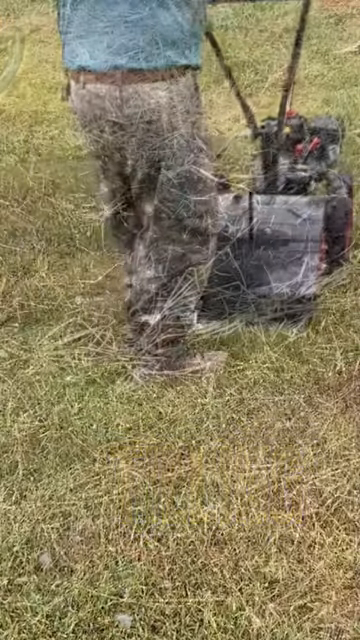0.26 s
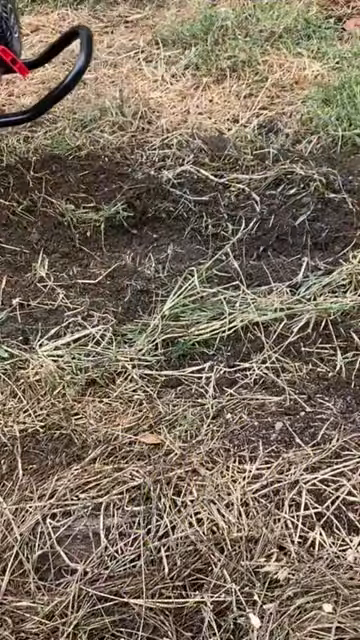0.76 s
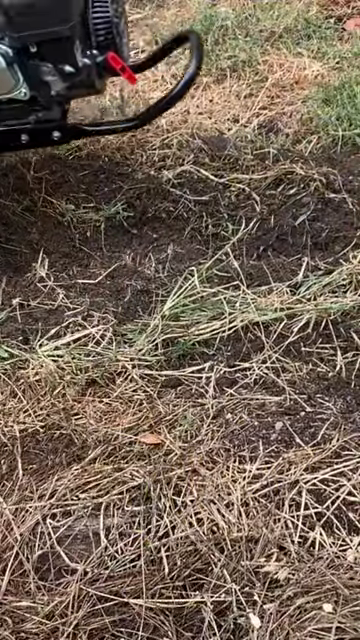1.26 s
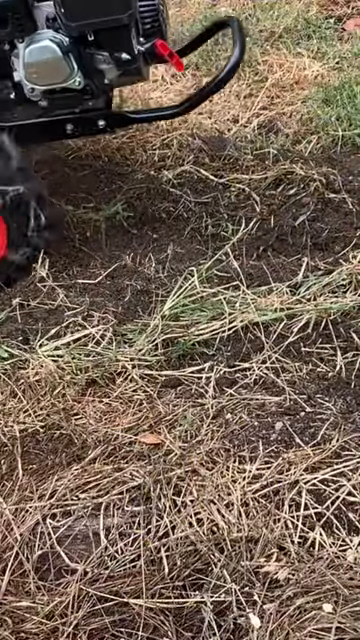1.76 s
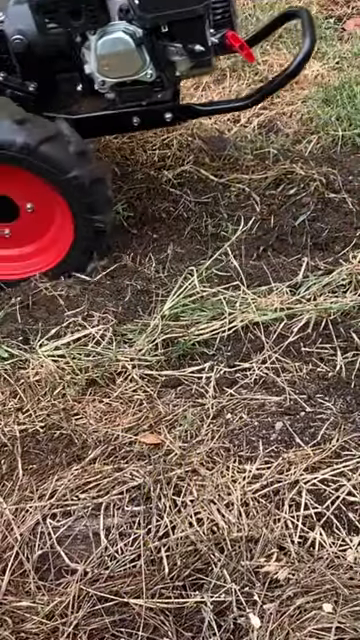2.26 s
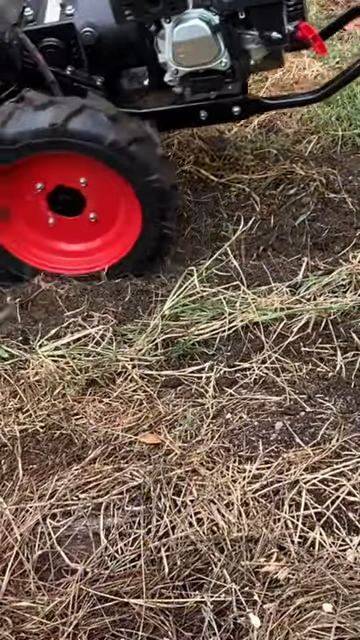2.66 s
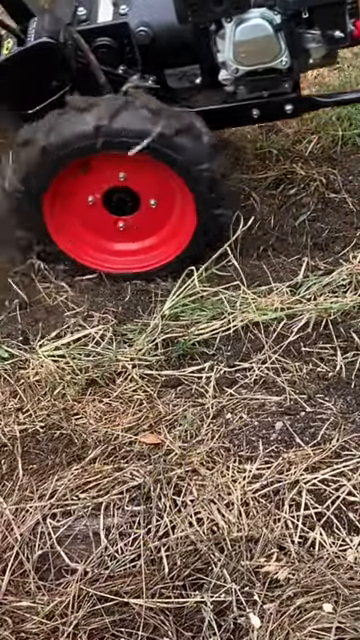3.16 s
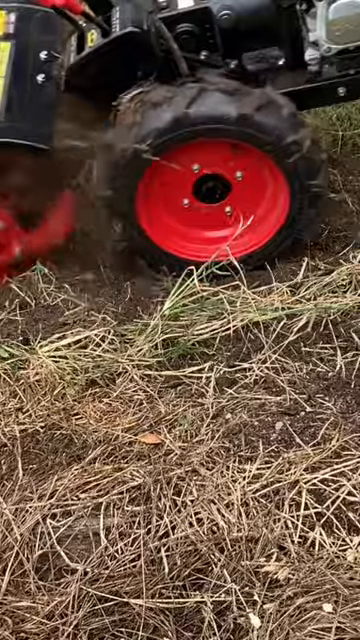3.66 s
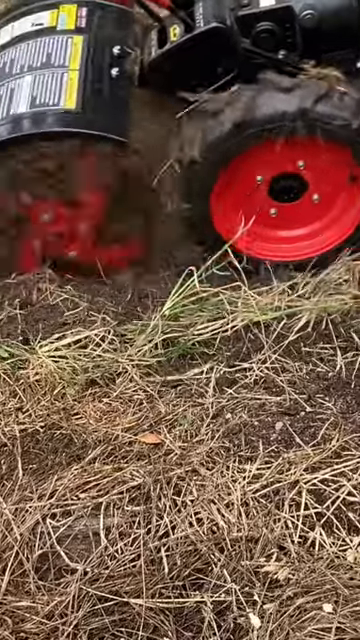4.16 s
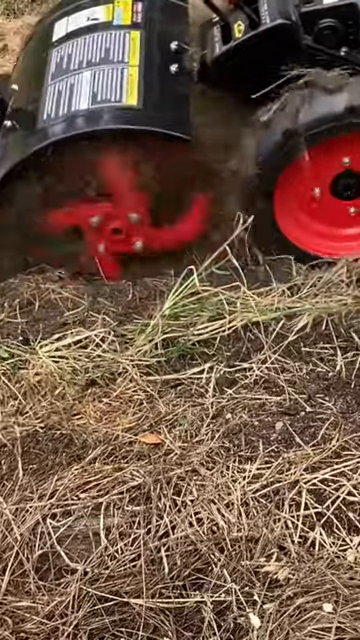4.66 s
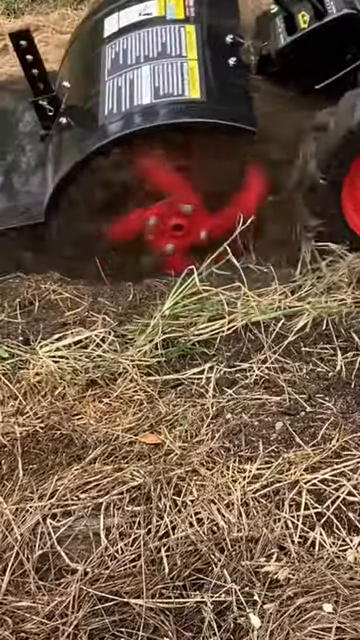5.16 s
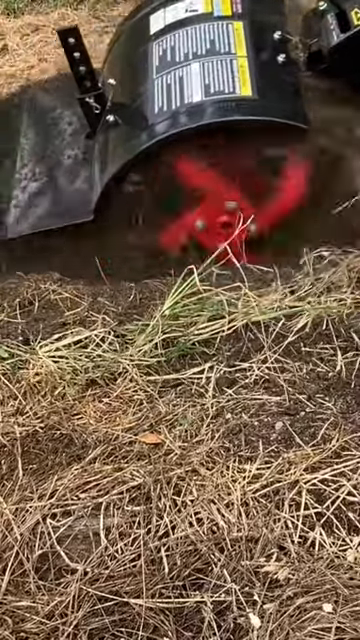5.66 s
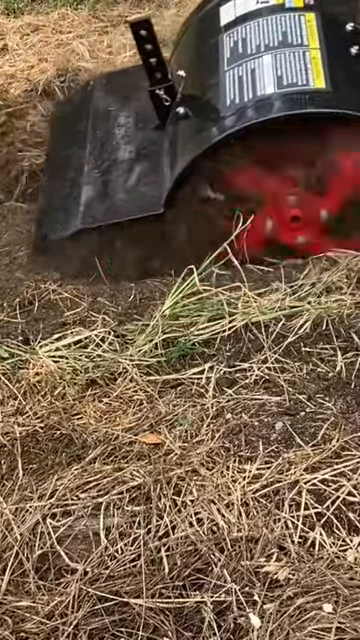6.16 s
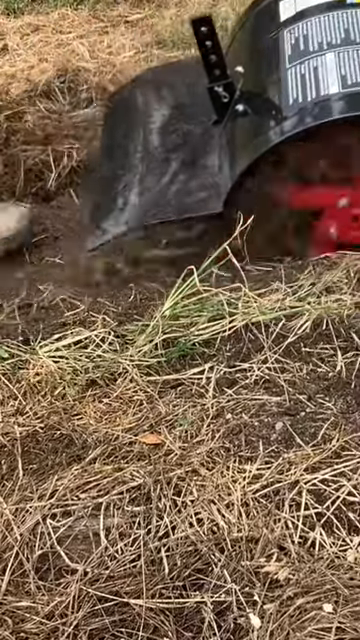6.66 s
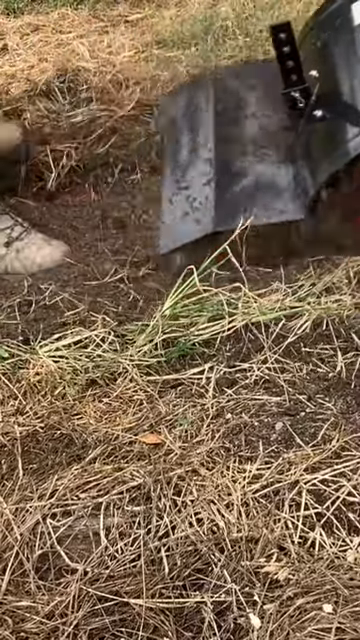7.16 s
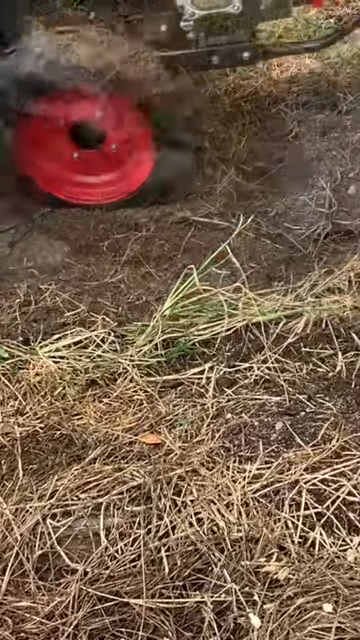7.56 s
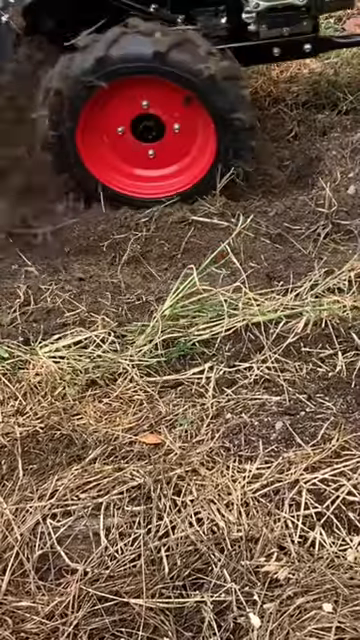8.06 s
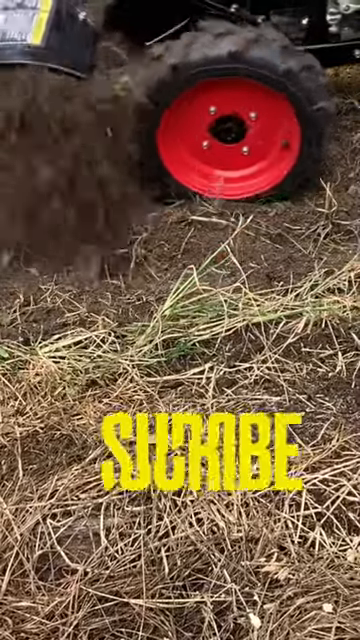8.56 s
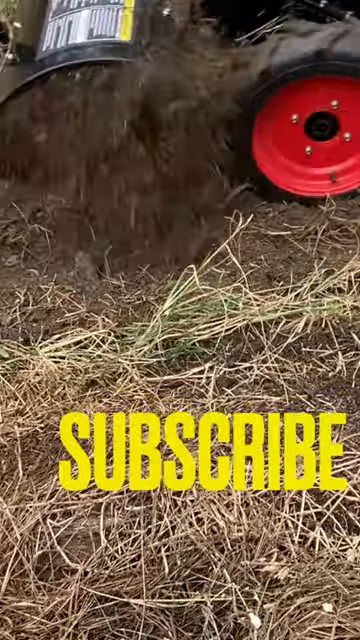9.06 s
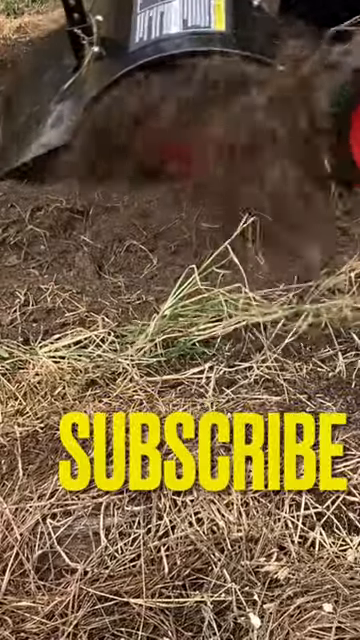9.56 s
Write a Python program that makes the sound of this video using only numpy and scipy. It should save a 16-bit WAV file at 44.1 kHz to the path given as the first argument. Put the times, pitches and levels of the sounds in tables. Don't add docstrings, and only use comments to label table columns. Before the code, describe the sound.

A small petrol tiller putters fast and rattles close by outdoors, its loose panels clacking while stones knock the metal hood and soil sprays.

```python
import sys
import numpy as np
from scipy import signal
from scipy.fft import rfft, irfft, next_fast_len
from scipy.io import wavfile
from scipy.ndimage import uniform_filter1d

SR = 44100
rng = np.random.default_rng(int(sys.argv[2]) if len(sys.argv) > 2 else 0)


def rack_gain(trim_db):
    fader = np.asarray(trim_db, float)
    return 10 ** (fader / 20)


def store_pcm(level_fs):
    pcm = np.round(np.clip(level_fs, -1, 1) * 32767).astype(np.int16)
    wavfile.write(sys.argv[1], SR, np.atleast_2d(pcm).T)


N = 432621

# from_s, to_s
DISSOLVES = [
    (.22, 0.5),
    (7.28, 7.6),
]
# start_s, peak_db, main_ring_hz, grit_peak_db (grit thrown with it)
KNOCKS = [(0.7672, -12.5, 2400, -35), (0.894, -16, 1680, -36), (1.0726, -12, 2080, -27),
          (1.246, -11, 1720, -14), (1.629, -10, 2200, -11.5), (1.691, -0.5, 1950, -6),
          (2.0836, -4.5, 2710, -1), (2.2722, -7, 2740, -6), (2.401, -15, 1860, -25),
          (2.445, -10, 1483, -16), (2.954, -10, 2570, -34), (3.3688, -17, 2560, -29),
          (3.446, -2.5, 2700, -2.5), (3.8097, -19, 2040, -26), (3.944, -19, 2560, -16),
          (4.073, -19.5, 1720, -41), (4.325, -17, 1480, -34), (4.537, -13, 2930, -6),
          (4.863, -16, 2800, -12), (6.417, -20.5, 2960, -5), (6.87, -13.5, 1926, -17),
          (6.9536, -15, 3050, -11), (7.724, -13, 1880, -23), (8.1616, -14, 2800, -29),
          (8.3128, -16, 2680, -10), (8.453, -13, 1470, -18), (8.6159, -13.5, 2730, -8),
          (8.921, -15, 2700, -8.5), (9.246, -14, 2770, -22), (9.5512, -15, 1820, -3.5)]


def in_time(rows):
    s, *columns = np.transpose(rows)
    return [np.interp(np.arange(N) / SR, s, c) for c in columns]


def rms_one(x):
    return x / np.sqrt(np.mean(x ** 2) + 1e-20)


def drift(rate):
    steps = rng.standard_normal(int(N / SR * rate) + 2)
    return np.interp(np.arange(N) / SR * rate, np.arange(len(steps)), steps)


def ring(clicks, hz, t60):
    r = rack_gain(-60 / (t60 * SR))
    w = 2 * np.pi * hz / SR
    return signal.lfilter([0, np.sin(w)], [1, -2 * r * np.cos(w), r * r], clicks + 1e-18)


def dying(clicks, t60):
    return signal.lfilter([1], [1, -rack_gain(-60 / (t60 * SR))], clicks + 1e-18)


def band(x, low_hz, high_hz):
    return signal.sosfilt(signal.butter(3, [low_hz, high_hz], "band", fs=SR, output="sos"), x)


def views():
    # time_s, cycles_per_s
    speed_behind = [(0.0, 25.48), (0.18, 25.34), (0.6, 25.35)]
    speed_pass_one = [(0.2, 24.188), (0.726, 24.116), (1.063, 22.041), (1.246, 24.036), (1.84, 24.745),
                      (2.27, 23.496), (2.416, 22.533), (2.705, 24.201), (3.418, 24.037), (3.748, 21.187),
                      (4.08, 24.29), (4.224, 22.96), (4.574, 23.92), (4.989, 23.438), (5.062, 24.209),
                      (5.846, 23.659), (6.788, 23.732), (7.6, 19.268)]
    speed_pass_two = [(7.2, 23.83), (7.58, 24.4), (7.76, 24.6), (7.92, 24.08), (8.09, 24.29), (8.26, 24.19),
                      (8.43, 23.62), (8.6, 23.67), (8.77, 24.32), (8.94, 24.11), (9.11, 24.36),
                      (9.28, 24.13), (9.45, 24.55), (9.62, 24.44), (9.81, 25.66)]
    cycle_at_start = .616, .297, .665
    t = np.arange(N) / SR
    cycles = []
    for speed, start in zip((speed_behind, speed_pass_one, speed_pass_two), cycle_at_start):
        running = in_time(speed)[0] * (t >= speed[0][0])
        cycles.append(start + np.cumsum(running) / SR)
    first, second = [np.clip((t - a) / (b - a), 0, 1) for a, b in DISSOLVES]
    return cycles, [1 - first, first * (1 - second), second]


def exhaust(cycle, share, pulses, uneven_db):
    heard, out = share > 0, np.zeros(N)
    speed = np.gradient(cycle[heard])
    pace = np.sqrt(speed / np.median(speed))
    for degrees, hz, swing, t60 in pulses:
        turn = np.floor(cycle[heard] - pace * degrees / 720)
        strength = rack_gain(uneven_db * rng.standard_normal(300))[turn.astype(int) % 300]
        out[heard] += ring(swing * strength * np.diff(turn, prepend=turn[0]), hz, t60)
    return np.sqrt(share) * out / np.std(out[heard])


def exhaust_in_views(cycles, shares):
    # crank_deg (of 720 after firing), ring_hz,
    # pressure_swing, t60_s
    pulses_behind = [
        (-43, 429, -0.02, 0.08),
        (-24, 84, 0.038, 0.08),
        (77, 191, 0.124, 0.067),
        (166, 40, 0.308, 0.025),
        (226, 296, -0.09, 0.029),
        (254, 160, -0.269, 0.04),
        (428, 255, -0.026, 0.058),
        (461, 69, 0.218, 0.018),
    ]
    pulses_beside = [(-13, 536, 0.131, 0.008), (35, 181, 0.103, 0.08), (41, 434, -0.018, 0.08),
                     (125, 246, -0.037, 0.08), (156, 78, 0.158, 0.074), (219, 158, -0.358, 0.018),
                     (305, 43, 0.367, 0.012), (470, 192, 0.085, 0.022),
                     (-40, 620, .045, .008), (186, 620, -.05, .008), (492, 400, .02, .01)]
    pipe_rings = [(204, 243, .031, .015), (119, 285, .053, .015), (150, 374, -.012, .08),
                  (155, 594, .046, .017)]
    pipe_rings_loaded = [(77, 206, .024, .08), (87, 227, -.06, .055), (332, 302, .016, .08),
                         (222, 377, .014, .08), (45, 432, .01, .08), (182, 599, .041, .015),
                         (183, 700, .021, .015)]
    beside = pulses_beside
    pulses = pulses_behind, beside + pipe_rings, beside + pipe_rings_loaded
    return sum(exhaust(c, w, p, uneven_db=0.85) for c, p, w in zip(cycles, pulses, shares))


def shaking(cycle, luck, jolt_db, fade, uneven_db):
    strength = rack_gain(uneven_db * luck)[(cycle + .03).astype(int) % len(luck)]
    since = (cycle + 0.049) % 1
    jolt = np.exp(-since / fade)
    jolt += 0.04 * np.exp(-((since - .3) % 1) / fade)
    jolt += 0.11 * np.exp(-((since - .7) % 1) / fade)
    return 1 + rack_gain(jolt_db) * uniform_filter1d(strength * jolt, size=110)


def rattle(shake, per_s, spread_db, smooth, patchy_db):
    sizes = rack_gain(spread_db * np.minimum(rng.exponential(1, N), 4)) * rng.choice([-1, 1], N)
    grains = rms_one(sizes * (rng.random(N) < per_s / SR))
    noise = rng.standard_normal((3, N))
    noise[0] = rms_one(grains + smooth * noise[0])
    return noise * shake * rack_gain(patchy_db * (0.3 * drift(7.4) + 0.85 * drift(40)))


def grit_spray(noise, patchy_db):
    spray = 0
    for low_hz, high_hz in ((3700, 6500), (6500, 11500), (11500, 17000)):
        patches = rack_gain(patchy_db * (0.4 * drift(14) + 1.36 * drift(45)))
        spray = spray + band(noise, low_hz, high_hz) * patches
    return rms_one(spray)


def machine_body(x):
    # pitch_hz, level_db (per Hz)
    machine_colour = [(60, -4.5), (150, -2), (400, 0), (900, 2), (1900, 0), (2800, -4.5), (3300, -4),
                      (4500, -1), (7300, -6.5), (9000, 0), (10500, -1.5), (12500, -6.5), (15500, -11.5),
                      (17000, -33)]
    # pitch_hz, width_hz, level_db
    resonances = [(567, 30, -8.5), (942, 55, -3), (1096, 82, -4.5), (1464, 55, -1), (1523, 49, 0),
                  (1860, 63, -6.5), (2420, 140, -2), (2560, 101, 3), (2815, 60, 0), (3400, 90, -49),
                  (8590, 530, -1), (9700, 160, -5)]
    size = 4096
    hz = np.arange(size // 2 + 1) * SR / size + 1
    colour_hz, colour_db = np.transpose(machine_colour)
    broad = rack_gain(np.interp(np.log(hz), np.log(colour_hz), colour_db))
    peaks = sum(rack_gain(db) ** 2 / (1 + (2 * (hz - f) / width) ** 2) for f, width, db in resonances)
    cepstrum = irfft(np.log(broad * np.sqrt(0.58 + peaks)))
    cepstrum[1:size // 2] *= 2
    cepstrum[size // 2 + 1:] = 0
    response = irfft(np.exp(rfft(cepstrum)))
    return signal.fftconvolve(x, response[None], axes=1)[:, :N]


def struck_panels(cycles, shares, panels, uneven_db):
    firing = sum(np.sqrt(w) * np.diff(np.floor(c), prepend=np.floor(c[0])) for c, w in zip(cycles, shares))
    at, out = np.flatnonzero(firing), 0
    for hz, db, t60 in panels:
        clicks = np.zeros(N)
        late = rng.integers(0, 120, len(at))
        luck = np.clip(rng.standard_normal(len(at)), -2, 1.5)
        clicks[np.minimum(at + late, N - 1)] = firing[at] * rack_gain(db + uneven_db * luck)
        out = out + ring(clicks, hz, t60)
    return out


def panels_in_passes(cycles, shares):
    # pitch_hz, level_db, t60_s
    struck = [(947, -12, 0.037), (1051, -15, 0.078), (1490, -30, 0.02), (1530, -26, 0.047),
              (1860, -31, 0.03), (2560, -5, 0.043), (2740, -25, 0.016)]
    struck_loaded = [(850, -4, .05), (1095, -1, 0.11), (1180, -6, 0.034), (2480, -23, 0.025)]
    both_passes = struck_panels(cycles[1:], shares[1:], struck, uneven_db=7.5)
    return both_passes + struck_panels(cycles[2:], shares[2:], struck_loaded, uneven_db=4.5)


def panel_slaps(cycles):
    # from_s, to_s, ring_db, ring_hz, tick_db
    spells = [
        (.38, .62, -31, 2490, -25),
        (.75, 1.4, -31, 2520, -24),
        (2.3, 3.1, -34, 2510, -24),
        (3.6, 4.45, -33, 1860, -23),
        (5.35, 6.2, -43, 1510, -28),
        (7.6, 8.8, -41, 1720, -24.5),
        (9.08, 9.55, -34, 1490, -22.5),
    ]
    rings, ticks = np.zeros(N), np.zeros(N)
    for start, end, ring_db, hz, tick_db in spells:
        cycle = cycles[1 if start < DISSOLVES[1][1] - .1 else 2]
        at = np.flatnonzero(np.diff(np.floor(cycle + 0.0267)))
        at = at[(at > start * SR) & (at < end * SR)]
        luck = 2.5 * np.clip(rng.standard_normal((40, 4))[:len(at)], -2, 1.5)
        ticks[at] = rack_gain(tick_db + luck[:, 3])
        for k, ratio in enumerate((.93, 1, 1.09)):
            clicks = np.zeros(N)
            clicks[at + 30 * k] = rack_gain(ring_db + luck[:, 3] + luck[:, k])
            rings += ring(clicks, hz * ratio, t60=0.035)
    return rings, ticks


def panel_clacks():
    # start_s, peak_db, ring_hz
    clacks = [(0.4763, -19, 2480), (0.809, -10, 1760), (0.9378, -12, 2470), (1.0294, -15, 2540),
              (1.1183, -11, 2530), (1.1616, -13, 2570), (1.2042, -8, 2670), (1.288, -12, 2500),
              (1.329, -14, 1480), (2.3194, -8, 2590), (3.6272, -3, 1570), (3.8571, -17, 1720),
              (3.901, -14, 1490), (4.1954, -25, 1710), (4.451, -10, 1450), (4.961, -8.5, 1420),
              (5.3752, -23, 1540), (5.4164, -16, 1530), (5.4615, -6, 1440), (5.7194, -21, 2630),
              (5.9225, -15, 1560), (6.177, -13.5, 1500), (7.668, -13, 1290), (7.7892, -25, 2030),
              (7.875, -17, 1790), (7.9144, -12, 2540), (7.9538, -15, 1510), (7.9808, -8, 2460),
              (8.079, -9, 2430), (8.3696, -17, 2550), (8.5809, -18, 1460), (8.8278, -15, 1440),
              (9.1165, -10, 1440), (9.1584, -24, 1580), (9.1985, -20, 1430), (9.3646, -17, 1490),
              (9.4053, -15, 1470)]
    rings, ticks = np.zeros(N), np.zeros(N)
    t = np.arange(int(.05 * SR))[:, None] / SR
    for s, peak_db, hz in clacks:
        at, luck = int(s * SR), rng.standard_normal((2, 4))
        modes_hz = hz * np.exp(0.064 * luck[1] * [0, 1, 1, 1])
        modes = rack_gain(3.0 * luck[0]) * np.sin(2 * np.pi * modes_hz * t)
        rings[at:at + len(t)] += (rack_gain(peak_db - 17.5 - 60 * t / 0.035) * modes).sum(axis=1)
        ticks[at] += rack_gain(peak_db - 20.5)
    return rings, ticks


def contact_ticks(clicks):
    envelope = uniform_filter1d(dying(clicks, t60=0.034), size=110)
    return envelope * rms_one(band(rng.standard_normal(N), 800, 22000))


def panel_rings():
    # start_s, peak_db
    tank_firings = [(0.767, -13), (0.8934, -16), (1.0284, -17), (1.3297, -24), (1.3671, -15), (1.4514, -19),
                    (1.694, -19), (2.2705, -27), (2.4077, -13), (2.707, -19), (2.7859, -18), (3.2429, -24),
                    (3.8999, -25), (3.94, -12), (4.0311, -15), (4.069, -18), (4.324, -12), (4.4511, -19),
                    (4.9585, -18), (5.0837, -22), (5.2099, -18), (5.3351, -18), (5.375, -17), (5.4175, -16),
                    (5.4608, -18), (5.5436, -24), (5.6699, -27), (5.7931, -24), (5.878, -20), (5.9216, -14),
                    (6.1767, -16), (6.26, -13), (6.6827, -20), (6.725, -18), (6.8074, -20), (6.954, -18),
                    (7.4593, -19), (7.6234, -17), (7.7466, -25), (7.9512, -19), (8.1597, -20),
                    (8.3218, -13), (8.3533, -21), (8.449, -20), (8.5802, -20), (8.6596, -13), (8.7429, -14),
                    (8.8257, -23), (9.0706, -21), (9.1145, -23), (9.1564, -25), (9.1978, -15), (9.363, -20),
                    (9.4036, -12), (9.4857, -23), (9.551, -16)]
    shroud_firings = [(0.4772, -24), (0.559, -17), (0.768, -17), (0.939, -19), (0.9815, -13), (1.0309, -23),
                      (1.118, -19), (1.1623, -12), (1.203, -19), (1.2878, -22), (1.3292, -17),
                      (1.6918, -16), (1.861, -17), (2.083, -22), (2.2736, -8.5), (2.9565, -21),
                      (3.0773, -25), (3.2025, -27), (3.243, -21), (3.286, -14), (3.327, -18), (3.3696, -17),
                      (3.4453, -18), (3.858, -25), (3.9009, -29), (3.9446, -18), (4.074, -21),
                      (4.3703, -28), (4.4147, -26), (4.539, -24), (4.668, -21), (4.7933, -24), (4.862, -25),
                      (5.6748, -27), (5.7172, -26), (5.841, -28), (7.874, -23), (7.9148, -28),
                      (7.9554, -14), (8.0789, -24), (8.312, -27), (8.37, -15), (8.4535, -17), (8.4952, -15),
                      (8.6175, -15), (8.9294, -15), (9.0377, -15), (9.158, -31), (9.2447, -22),
                      (9.326, -20)]
    # pitch_hz, level_db, t60_s
    tank_modes = [(1446, -10.5, 0.071), (1527, -5.5, 0.064)]
    shroud_modes = [(2470, -10, 0.03), (2570, -5.5, 0.048)]
    out = np.zeros(N)
    for rows, modes in ((tank_firings, tank_modes), (shroud_firings, shroud_modes)):
        s, peak_db = np.transpose(rows)
        clicks = np.zeros(N)
        clicks[(s * SR).astype(int)] = rack_gain(peak_db)
        for k, (hz, db, t60) in enumerate(modes):
            out += rack_gain(db) * ring(np.roll(clicks, 70 * k), hz, t60)
    return out


def grit_hits():
    # start_s, peak_db
    lone_hits = [(0.512, -12), (0.592, -12), (.9384, -32), (1.0277, -14), (1.062, -11.5), (1.118, -21),
                 (1.16, -13), (1.567, -9.5), (1.685, -17), (1.735, -20), (1.796, -7), (1.888, -3),
                 (2.188, -18), (2.5123, -15), (2.538, -12.5), (2.768, -11), (2.9454, -12.5), (3.081, -22),
                 (3.214, -13), (3.327, -10), (3.479, -25), (3.979, -12), (4.0166, -11), (4.1082, -23),
                 (4.2, -12.5), (4.82, -12.5), (5.0087, -8.5), (5.048, -10), (5.28, -7.5), (5.409, -7),
                 (5.631, -15), (5.683, -6.5), (5.718, -11), (5.757, -13), (5.829, -12), (5.8826, -14.5),
                 (5.926, -14), (5.946, -9.5), (6.0916, -13.5), (6.4645, -8.5), (6.503, -6), (6.644, -10),
                 (6.659, -6), (6.7047, -9.5), (6.985, -16), (7.028, -16), (7.0724, -16), (7.1178, -17),
                 (7.163, -14), (7.196, -11), (7.26, -11.5), (7.307, -13), (7.7475, -15), (7.888, -6.5),
                 (8.0722, -14), (8.265, -8), (8.489, -8), (8.7052, -15), (9.627, -9.5), (9.734, -15),
                 (.7663, -31), (1.2053, -17), (2.0663, -12), (3.8572, -29), (3.9016, -23), (5.7958, -24),
               (7.211, -22), (7.273, -20), (7.355, -20), (8.3795, -13), (9.425, -14), (9.456, -13),
               (6.768, -19.5), (6.33, -18)]
    clicks = np.zeros(N)
    for s, peak_db in lone_hits + [(k[0], k[3]) for k in KNOCKS]:
        clicks[int(s * SR)] += rack_gain(peak_db)
    tick, scatter = dying(clicks, t60=.028), dying(clicks, t60=.1)
    envelope = uniform_filter1d(tick + 0.31 * scatter, size=120, origin=24)
    return rack_gain(-6.0) * envelope * rms_one(band(rng.standard_normal(N), 3870, 20200))


def knocks():
    # time_s, bright_db, t60_s
    hood_facing = [(1.0, -12, 0.047), (3.5, -20, 0.061), (4.6, -12, 0.12), (9.8, 2, 0.13)]
    hood_modes_hz = [740, 1300, 1500, 1760, 1850, 1965, 2090, 2385, 2490, 2600, 2670, 2850, 2980, 3215]
    crack, thud, rings = np.zeros(N), np.zeros(N), np.zeros(N)
    t = np.arange(int(.16 * SR)) / SR
    facing_s, facing_db, facing_t60 = np.transpose(hood_facing)
    for s, peak_db, hz, _ in KNOCKS:
        bright_db, t60 = np.interp(s, facing_s, facing_db), np.interp(s, facing_s, facing_t60)
        detune, start = rng.normal(0, .24, (14, 1)), rng.random((14, 1))
        modes_hz = np.array(hood_modes_hz)[:, None] * (1 + .04 * detune)
        woken_db = 10 * detune - 21 * abs(np.log2(modes_hz / hz))
        modes = rack_gain(woken_db) * np.sin(2 * np.pi * (modes_hz * t + start))
        shudder = rack_gain(-19 - 60 * t / 0.22)
        fading = rack_gain(-60 * t / max(t60, .03)) + shudder
        envelope = rack_gain(peak_db) * fading * np.minimum(t / .003, 1)
        at = int(s * SR)
        end = min(len(t), N - at)
        rings[at:at + end] += (rack_gain(-8.5) * envelope * modes.sum(axis=0))[:end]
        thud[at:at + end] += envelope[:end]
        crack[at:at + end] += (rack_gain(bright_db) * envelope)[:end]
    dull = thud * rms_one(band(rng.standard_normal(N), 930, 4700)) * rack_gain(-15.0)
    bright = crack * rms_one(band(rng.standard_normal(N), 1900, 9000)) * rack_gain(-9.0)
    return rings, dull + bright


def scrapes():
    # start_s, length_s, level_db
    root_drags = [(3.703, 0.023, -25.5), (5.68, 0.018, -34), (5.717, 0.033, -25), (5.936, 0.037, -35),
                  (6.418, 0.022, -26), (6.51, 0.03, -30), (6.662, 0.026, -29), (6.712, 0.023, -30),
                  (1.729, 0.026, -23), (6.951, .03, -24), (7.454, 0.015, -30), (8.603, 0.043, -27.5),
                  (9.245, .055, -25)]
    t = np.arange(N) / SR
    held = sum(rack_gain(db) * ((t > s) & (t < s + length)) for s, length, db in root_drags)
    rough = rack_gain(2.2 * drift(200))
    return uniform_filter1d(held, size=300) * rough * rms_one(band(rng.standard_normal(N), 2180, 3900))


def ports(common, own, pan_db):
    # pitch_hz, left_lead_rad
    port_phase = [(0, 0), (860, -1.2), (1980, .3), (3010, -.1), (3790, -4.0), (4300, -4.4), (5050, -3.3),
                  (6000, -3.0), (7670, -.3), (8700, .1), (9470, .5), (11250, 3.08), (12800, 3.2),
                  (14000, 6.2), (16500, 6.3)]
    # pitch_hz, left_right_db, unlike_share (sound that differs between them)
    port_balance = [(100, 1.4, .03), (400, 1.5, .12), (700, 0, .27), (1500, 0, .35), (2800, -.5, .45),
                    (3600, 0, .32), (4300, -.5, .36), (5200, 0, .1), (6000, 0, .09), (7000, 0, .3),
                    (8200, 0, .16), (9800, 0, .3), (11250, 0, .027), (12800, 0, .03), (13500, 0, .4),
                    (14500, 0, .14)]
    size = next_fast_len(N)
    hz = np.arange(size // 2 + 1) * SR / size
    at, tilt_db, unlike = np.transpose(port_balance)
    tilt_db = np.interp(np.log(hz + 1), np.log(at), tilt_db)
    unlike = np.interp(np.log(hz + 1), np.log(at), np.clip(unlike, 0, .9))
    side = np.array([[.5], [-.5]])
    turn = rack_gain(tilt_db * side) * np.exp(1j * side * np.interp(hz, *np.transpose(port_phase)))
    both = rfft(common, size) * turn * np.sqrt(1 - unlike ** 2) + rfft(own, size) * unlike
    middle = np.exp(-np.log((hz + 1) / 1500) ** 4 / 0.24)
    steady = irfft(both * (1 - middle), size)[:, :N]
    return steady + irfft(both * middle, size)[:, :N] * rack_gain(pan_db * side)


def scene():
    # time_s, exhaust_db (engine effort heard), bite_db (of the tines)
    work = [(0, -23, -4.5), (.35, -28, -1.5), (.65, -27, 0), (1.1, -24.5, 0.5), (1.5, -25, 1),
            (2.5, -26.5, 1.5), (3.3, -28, 1), (3.9, -27.5, -1), (5.0, -28, 1), (5.4, -27.5, -0.5),
            (6.2, -28, 1), (6.6, -28, 2), (7.1, -27.5, -1.5), (7.4, -29.5, -2), (7.85, -23.5, 3),
            (8.5, -22.5, 2.5), (9.4, -23.5, 1), (9.81, -26, 0)]
    exhaust_db, bite_db = in_time(work)
    cycles, shares = views()
    thump = exhaust_in_views(cycles, shares)
    frame_db = exhaust_db - 0.72 - 2 * shares[0] + 0.23 * bite_db
    hood_db = -35.5 + 1.35 * bite_db
    grit_db = -33.5 + bite_db
    pan_db = 0
    for share, fade, entry_db, db_per_s in zip(shares[1:], DISSOLVES, (1, -5), (-1.69, -2)):
        pan_db = pan_db + share * (entry_db + db_per_s * (np.arange(N) / SR - fade[1]))
    luck = np.clip(rng.standard_normal(300), -1.5, 1.3)

    def shake(jolt_db, fade):
        jolts_db = jolt_db - 32, jolt_db, jolt_db - 3.5
        return sum(w * shaking(c, luck, j, fade, 2.5) for c, w, j in zip(cycles, shares, jolts_db))

    frame = rattle(shake(jolt_db=2.5, fade=0.16), per_s=2500, spread_db=3.0, smooth=0.97, patchy_db=1.58)
    hood = rattle(shake(jolt_db=-0.5, fade=0.17), per_s=2500, spread_db=0.0, smooth=0.28, patchy_db=4.0)
    grit = rattle(shake(jolt_db=5.0, fade=0.17), per_s=2300, spread_db=-1.0, smooth=0.96, patchy_db=2.3)
    slap_rings, slap_clicks = panel_slaps(cycles)
    clack_rings, clack_clicks = panel_clacks()
    knock_rings, cracks = knocks()
    hits = cracks + grit_hits() + contact_ticks(slap_clicks + clack_clicks)

    shaken = rack_gain(frame_db - 0.38) * rms_one(band(frame, 176, 1896))
    shaken = shaken + rack_gain(hood_db + 3.5) * rms_one(band(hood, 1730, 3900))
    shaken = shaken + rack_gain(grit_db + 10) * grit_spray(grit, patchy_db=2.0)
    shaken = shaken + rack_gain([[3.5], [12.0], [13.0]]) * hits
    body = machine_body(shaken)

    clean = rack_gain(exhaust_db + 0.5) * thump + knock_rings + slap_rings + clack_rings
    clean = clean + rack_gain(frame_db - 1.5) * panels_in_passes(cycles, shares)
    clean = clean + panel_rings() + scrapes()
    scattered = body[1:] * rack_gain(2.5 * drift(14))
    own = scattered + knock_rings * rng.choice([-.5, .5], (2, 1))
    return ports(body[0] + clean, own, pan_db)


def ducking():
    above_db, ratio = -7, 1.02
    delay_s, attack_s, recovery_db_per_s = 0.032, 0.041, 20
    t, down_db = np.arange(N) / SR - delay_s, np.zeros(N)
    for s, peak_db in [k[:2] for k in KNOCKS if k[1] > above_db]:
        recovered_db = recovery_db_per_s * np.maximum(t - s - attack_s, 0)
        depth_db = ratio * (peak_db - above_db) - recovered_db
        down_db = np.maximum(down_db, depth_db * np.clip((t - s) / attack_s, 0, 1))
    return rack_gain(-down_db)


def roll_off(x):
    return signal.sosfilt(signal.butter(12, 16970, fs=SR, output="sos"), x)


def record(dry):
    rumble_cut = signal.butter(3, 35, "high", fs=SR, output="sos")
    top_cut = signal.cheby2(16, 60, 16150, fs=SR, output="sos")
    ducked = signal.sosfiltfilt(rumble_cut, dry * ducking())
    rounded = np.tanh(ducked / 1.05) * 1.05
    mix = np.clip(signal.sosfilt(top_cut, rounded), -.93, .93)
    return roll_off(mix)


dry = scene()
out = record(dry)
store_pcm(out)
```